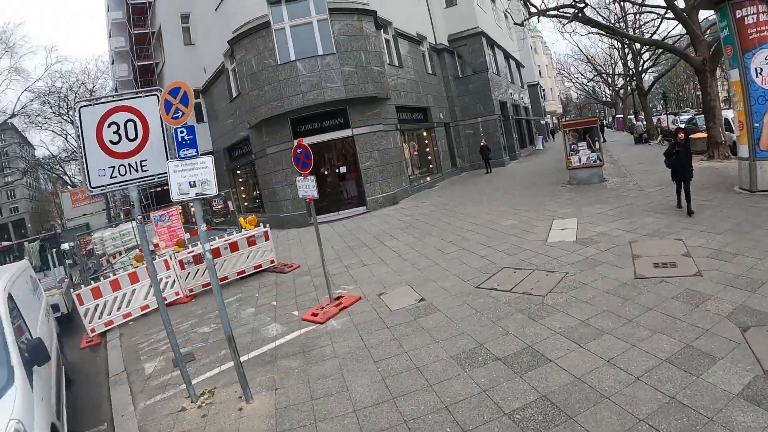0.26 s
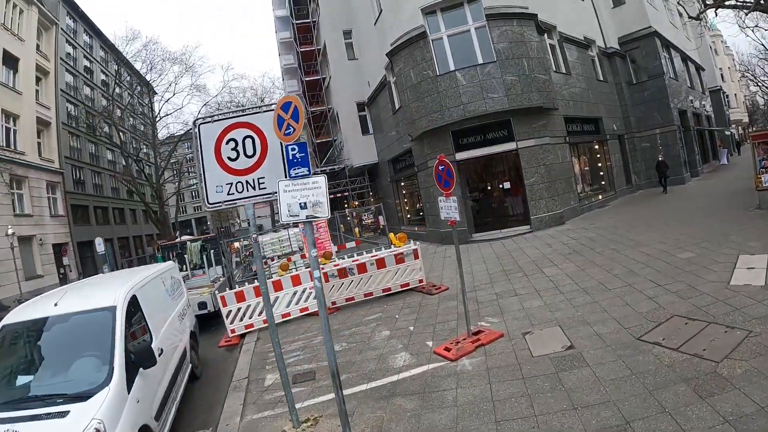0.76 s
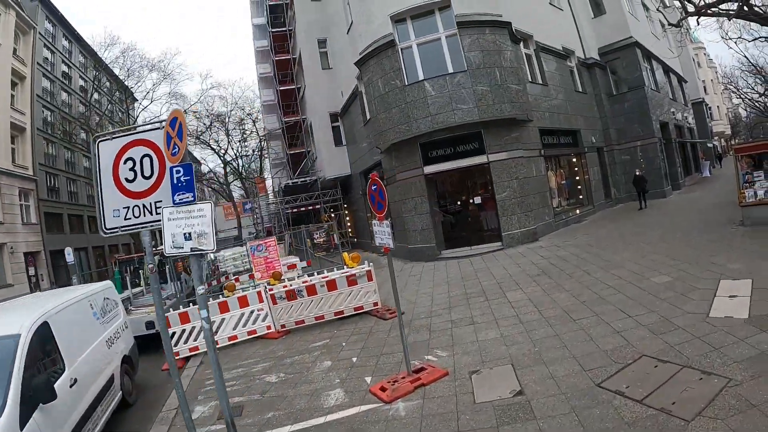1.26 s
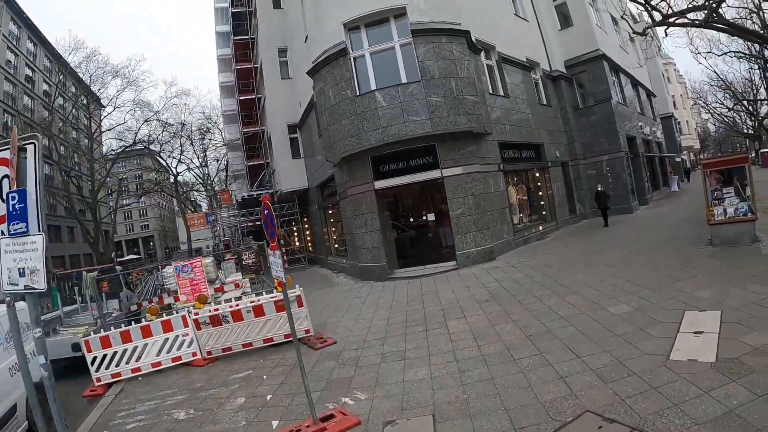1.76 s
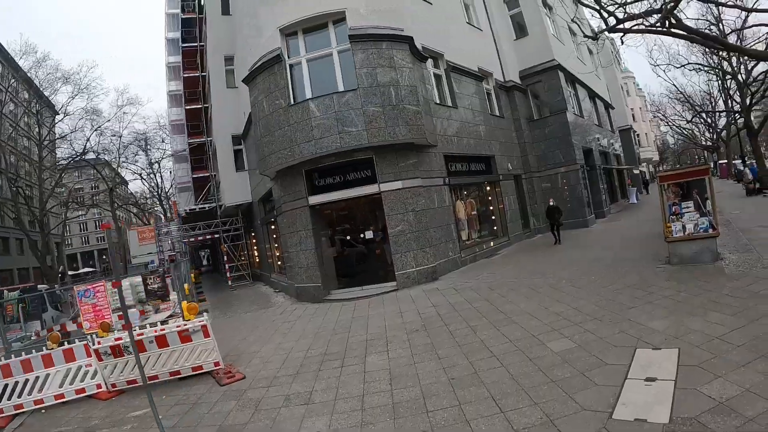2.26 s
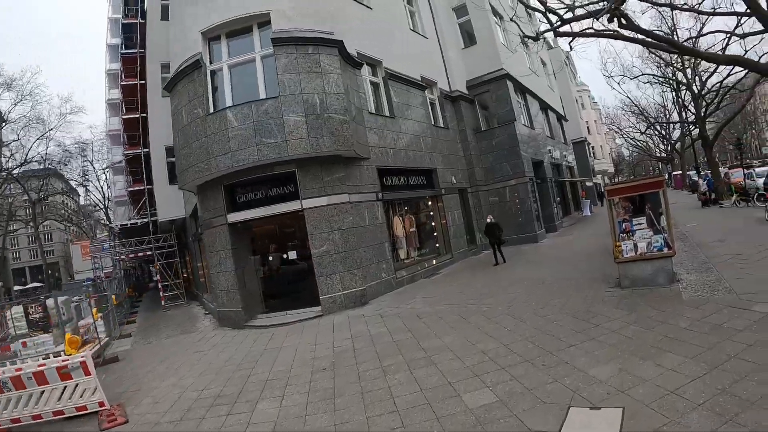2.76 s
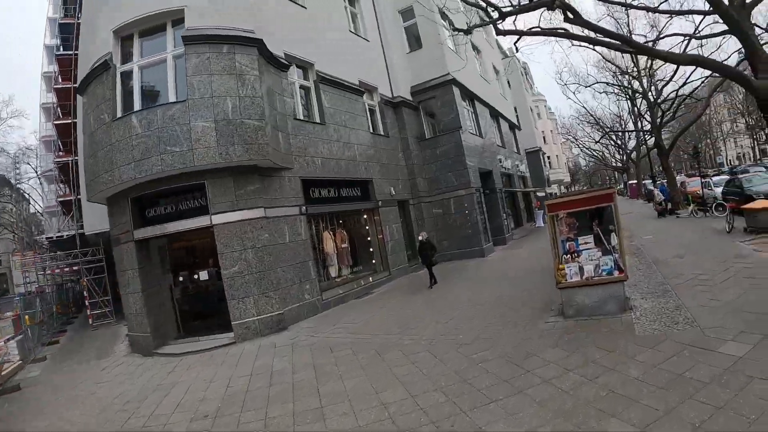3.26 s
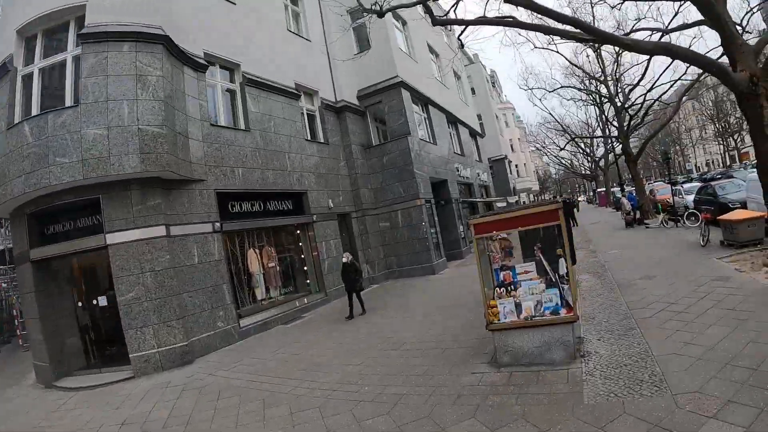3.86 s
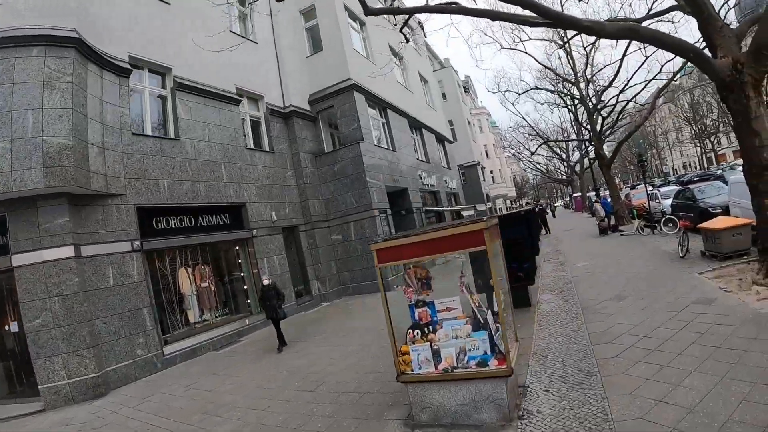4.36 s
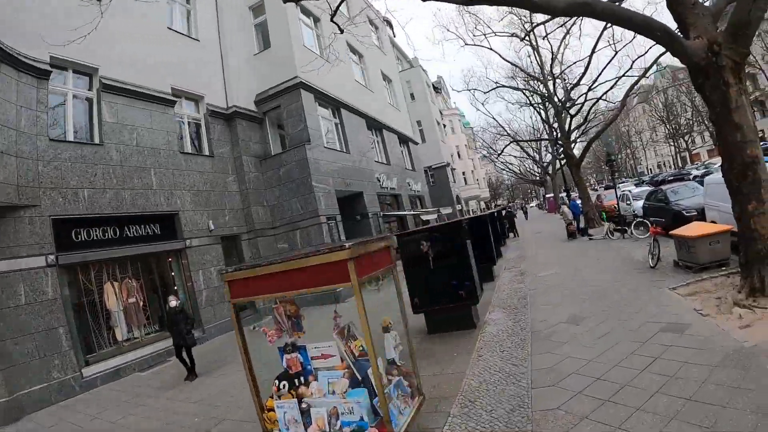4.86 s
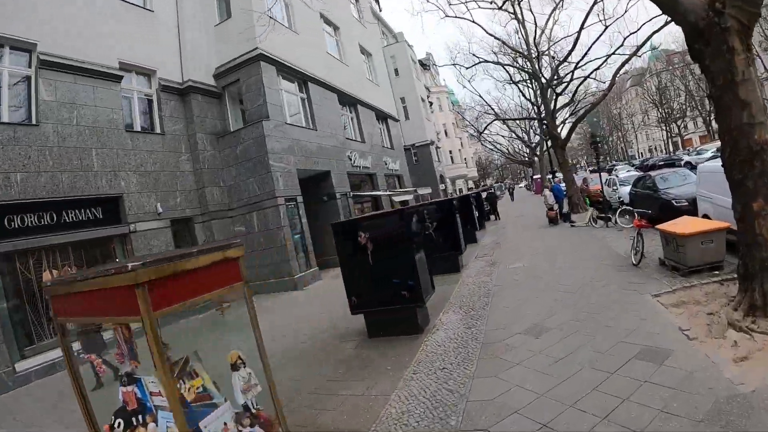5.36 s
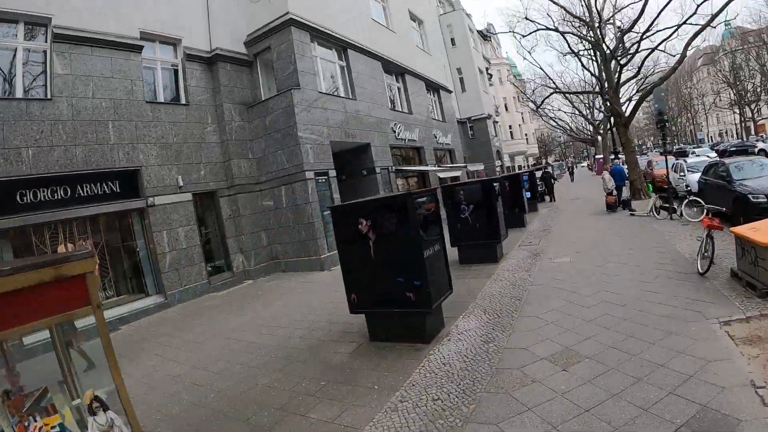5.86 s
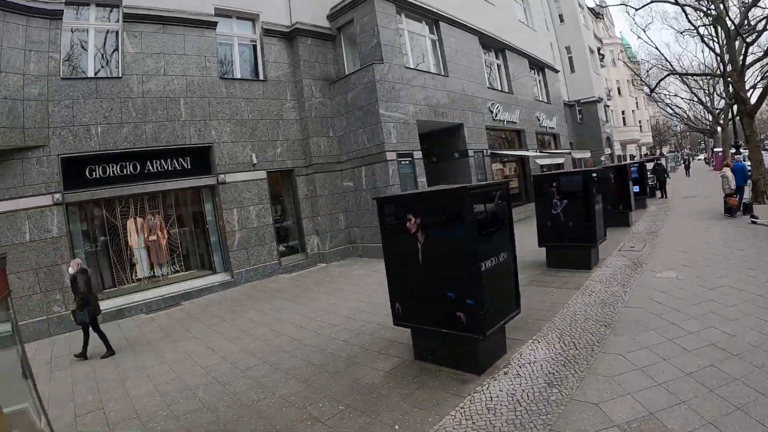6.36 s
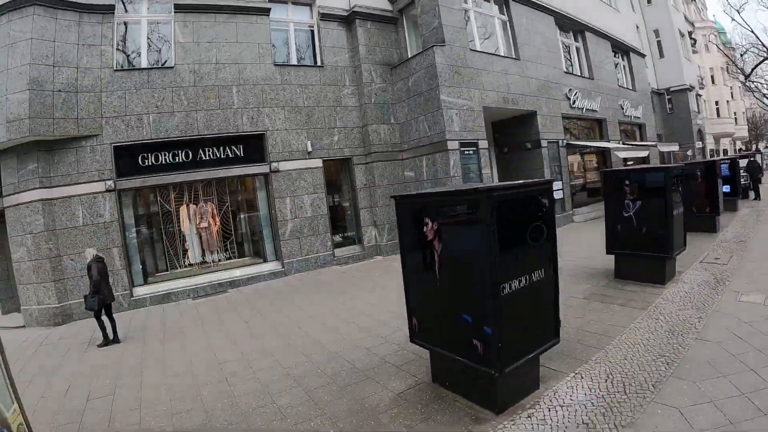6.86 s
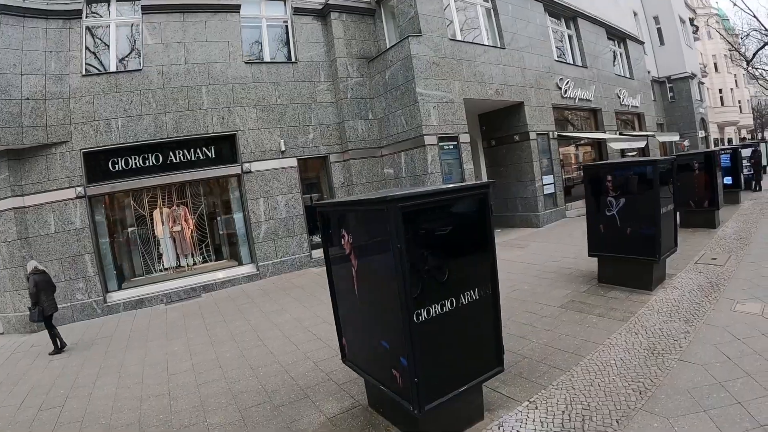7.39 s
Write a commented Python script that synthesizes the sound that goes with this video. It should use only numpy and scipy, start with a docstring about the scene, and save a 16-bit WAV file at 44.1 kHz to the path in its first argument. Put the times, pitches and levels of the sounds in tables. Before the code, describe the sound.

Low city traffic rumble with a heavy engine rising then dropping in pitch, later a faint metallic saw ringing, brief high brake squeal, and a slowing engine.

```python
"""Traffic past a city pavement

Ground rumble, engine drone, tyre roar and hiss: half-octave noise bands that swell and fade along level curves.
A heavy engine pulls up in pitch and eases off, others idle, start and slow: tones at multiples of the firing rhythm.
A saw blade rings in narrow noise bands beside a 7.5 kHz squealing band, a brake squeals very high as a wavering
sine in a halo of noise, faint noise bands and a swish swell and fade, damped modes make small knocks and ticks."""
import sys
import numpy as np
from scipy import signal
from scipy.fft import irfft, next_fast_len
from scipy.io import wavfile
from scipy.ndimage import uniform_filter1d

SR = 44100
rng = np.random.default_rng(int(sys.argv[2]) if len(sys.argv) > 2 else 0)


def unload_wav(signal):
    """Save mono or channel-first audio to the path in sys.argv[1] as 16-bit WAV at rate SR, clipped to [-1, 1]."""
    wavfile.write(
        sys.argv[1],
        SR,
        np.round(np.clip(np.atleast_2d(signal).T, -1, 1) * 32767).astype(np.int16),
    )


N = 336482

# Heavy engine pulling, then easing off. Each row: time in s, lowest tone in Hz, level in dB.
PULLING_ENGINE = [(0, 80.5, -19.5), (.45, 83.8, -24.5), (.68, 85.8, -27.5), (.89, 87.96, -29.5),
                  (1.29, 92.1, -29.5), (1.48, 92.3, -31.5), (1.66, 86.95, -29.5), (1.86, 79.9, -31.5),
                  (1.96, 76.3, -21.5), (2.18, 68.3, -16.5), (2.225, 65.7, -21.5), (2.27, 64.04, -15),
                  (2.33, 62.2, -14.5), (2.38, 59.8, -28.5), (2.6, 49.14, -32), (2.7, 45.44, -28),
                  (2.86, 42.5, -33), (2.92, 42.1, -43)]
# Saw blade and a squealing band. Each row: time in s, then level in dB of the lowest blade mode,
# of the close pair of blade modes, of a 7.5 kHz squealing band, of the top blade mode.
SAW_AND_SQUEAL_LEVELS = [(2.65, -85, -90, -95, -86.5), (2.88, -74, -71, -65, -60.5),
                         (3.05, -72, -64, -51.5, -62), (3.43, -69, -71, -68, -58.5),
                         (3.7, -60, -65, -66, -59.5), (3.92, -56, -66, -72, -63),
                         (3.97, -66, -68, -73, -66), (4.13, -65, -74, -76, -65.5),
                         (4.6, -67, -71, -79, -59.5), (5.02, -60, -68, -62, -58.5),
                         (5.12, -64, -66, -59, -56.5), (5.21, -67, -61, -56, -56),
                         (5.39, -64, -65, -56, -57), (5.57, -70, -80, -62.5, -77),
                         (5.88, -86, -93, -93, -87), (6.05, -77, -73, -74, -62.5),
                         (6.25, -61.5, -65, -75, -62), (6.59, -62.5, -63, -72, -65.5),
                         (6.76, -60, -64, -75, -67), (6.87, -60, -65, -78, -68),
                         (6.93, -72, -66, -77, -68.5), (7.03, -62, -63, -75, -67.5),
                         (7.16, -64, -64, -72, -65), (7.29, -71, -69, -76, -69.5),
                         (7.63, -78, -75, -78, -71)]


def undb(db):
    """Gain of a level in dB."""
    return 10 ** (np.asarray(db) / 20)


def columns(table):
    """Columns of a curve at every sample, then a gate with 30 ms fades just outside its first and last rows."""
    fade_s = .03
    row_s, *cols = np.transpose(table)
    t = np.arange(N) / SR
    since_start = t - row_s[0] + fade_s
    until_end = row_s[-1] + fade_s - t
    gate = np.clip(np.minimum(since_start, until_end) / fade_s, 0, 1)
    return [np.interp(t, row_s, col) for col in cols] + [gate]


def walk(rate_hz):
    """Random levels held 1 / rate_hz seconds and slewed twice; spread near 1."""
    hold = int(SR / rate_hz)
    steps = np.repeat(rng.standard_normal(N // hold + 1), hold)
    slewed = uniform_filter1d(uniform_filter1d(steps, hold), hold)
    return 1.3 * slewed[:N]


def noise(gain):
    """Noise whose spectrum follows gain(Hz), drawn bin by bin."""
    size = next_fast_len(N)
    hz = np.arange(size // 2 + 1) * SR / size + 1e-3  # offset keeps log(hz) finite
    bins = rng.standard_normal(2 * len(hz)).view(complex)
    return irfft(bins * gain(hz), size)[:N]


def unit(x):
    """Scaled to rms 1."""
    return x / np.sqrt(np.mean(x ** 2))


def ring(centre_hz, width_hz):
    """Noise of rms 1 heard through one steep resonance."""
    return unit(noise(lambda hz: 1 / (1 + (2 * (hz - centre_hz) / width_hz) ** 2) ** 1.5))


def tone(hz, waver_rad, multiple=1):
    """A tone of rms 1 whose phase wanders as firings or slips come unevenly."""
    phase = 2 * np.pi * np.cumsum(hz) / SR
    return np.sqrt(2) * np.sin(multiple * phase + waver_rad)


def traffic(flicker_db=0.74, lumps_db=1.16, dust=.12):
    """Half-octave bands of road noise; each flickers alone and follows the level of its layer."""
    # Noise spectrum within the layers. Each row: frequency in Hz, density in dB per Hz.
    road_spectrum = [(15, -12.5), (63, -3.5), (108, -6), (155, -12.5), (209, -16), (286, -15), (370, -17),
                     (507, -17.5), (880, -22.5), (1100, -23), (1520, -27), (1800, -28), (2100, -32),
                     (3100, -36.5), (3650, -38), (4100, -39), (5000, -48), (6500, -56), (8400, -49.5),
                     (9400, -59), (11000, -68), (12400, -72), (13500, -78), (14800, -98)]
    # Borders between the layers, in Hz.
    layer_edges_hz = [0, 60, 110, 210, 300, 750, 2000, 4200, 7000, 17000]
    # Each row: time in s, ground rumble in dB, exhaust boom in dB.
    rumble_levels = [(0, -31, -33), (.12, -29.5, -34), (.5, -34, -32.5), (.9, -29, -30.5),
                     (1.42, -38, -29.5), (1.58, -23.5, -28.5), (1.7, -27.5, -27), (1.9, -29, -35.5),
                     (2.3, -32, -34.5), (2.76, -30, -30), (2.91, -32, -37), (3.02, -30.5, -34.5),
                     (3.3, -24.5, -31.5), (3.37, -38, -38), (3.49, -31, -30), (3.7, -30, -31.5),
                     (3.76, -37, -36), (3.82, -25, -31), (4.16, -30, -36), (4.28, -46, -37),
                     (4.34, -25, -36), (4.48, -28, -29), (4.55, -36, -32), (4.61, -29, -33),
                     (5.15, -28.5, -33), (5.23, -30.5, -39), (5.5, -27.5, -29), (5.65, -33, -35),
                     (5.73, -26.5, -33.5), (6.1, -31, -28), (6.42, -23, -31.5), (6.58, -30.5, -40),
                     (6.66, -21.5, -36), (7.15, -35.5, -38), (7.24, -28.5, -31.5), (7.46, -26.5, -30),
                     (7.63, -28, -30)]
    # Each row: time in s, engine drone level in dB of the lower part, of the upper part.
    drone_levels = [(0, -39.5, -43.5), (.9, -37.5, -43), (1.5, -37, -42.5), (1.95, -37.5, -42),
                    (2.2, -36, -40), (2.46, -39, -44.5), (2.9, -40, -43.5), (3.5, -36.5, -42),
                    (4.2, -39, -42.5), (5, -38, -42.5), (5.4, -37, -41.5), (5.76, -37, -42.5),
                    (6.12, -35, -42.5), (6.35, -39.5, -42), (6.9, -35, -44), (7.63, -33.5, -43.5)]
    # Each row: time in s, low roar in dB, tread roar in dB, hiss in dB.
    tyre_levels = [(0, -42.5, -45, -59.5), (.3, -41.5, -44, -59), (.66, -41, -43, -56.5),
                   (1.3, -40.5, -42.5, -56.5), (1.9, -41, -44.5, -59.5), (2.2, -41, -45, -62),
                   (2.43, -44.5, -47, -66.5), (2.79, -41.5, -45, -69), (2.94, -42, -44, -61),
                   (3.7, -39, -41.5, -58.5), (4.2, -40, -41.5, -58.5), (5, -40, -40.5, -58.5),
                   (5.3, -39.5, -41, -60), (5.5, -40.5, -42, -64.5), (5.93, -41.5, -43.5, -67),
                   (6.1, -42.5, -44, -63), (6.45, -42.5, -43.5, -64), (6.9, -41.5, -43, -62),
                   (7.63, -42, -42.5, -64)]
    # Layers just below and above the hiss. Each row: mean level in dB, share of the swing in tread roar,
    # share of the swing in hiss.
    tyre_layers = [(-48.5, 0.68, 0.24), (-70, 1.3, 0.38)]

    road_hz, road_db = np.transpose(road_spectrum)
    layers = np.zeros((len(layer_edges_hz) - 1, N))
    for octave in np.arange(4, 14.5, .5):  # log2 of the band centre in Hz
        def gain(hz):
            offset = np.clip(np.log2(hz) - octave, -.5, .5)
            share = np.cos(np.pi * offset)  # neighbours add up to even power
            return share * undb(np.interp(np.log(hz), np.log(road_hz), road_db))
        layer = np.searchsorted(layer_edges_hz, 2 ** octave) - 1
        layers[layer] += noise(gain) * undb(flicker_db * walk(9))

    rumble_boom = [db + lumps_db * walk(6) for db in columns(rumble_levels)[:-1]]
    drone = columns(drone_levels)[:-1]
    low, roar, hiss = columns(tyre_levels)[:-1]
    roar_swing = roar - roar.mean()
    hiss_swing = hiss - hiss.mean()
    below, air = (mean_db + by_roar * roar_swing + by_hiss * hiss_swing
                  for mean_db, by_roar, by_hiss in tyre_layers)
    top_mode, cutting = columns(SAW_AND_SQUEAL_LEVELS)[-2:]
    air = air + dust * cutting * (top_mode - top_mode.mean())  # highest air partly follows the saw

    levels_db = rumble_boom + drone + [low, roar, below, hiss, air]
    return sum(unit(x) * undb(db) for x, db in zip(layers, levels_db))


def engine(table, tones_db=(0,), waver_rad=0.42, throb_db=1.5):
    """Exhaust tones at whole multiples of the firing rhythm; each throbs a little."""
    hz, level_db, gate = columns(table)
    out = np.zeros(N)
    for multiple, tone_db in enumerate(tones_db, start=1):
        gain = undb(level_db + tone_db + throb_db * walk(12))
        out += gain * tone(hz, waver_rad * walk(9), multiple)
    return gate * out


def load(waver_rad=.18, throb_db=1.1):
    """Upper exhaust tones of the pulling engine, on its firing rhythm; each throbs a little."""
    # Each row: time in s, level in dB of tone 2, of tone 3, of tone 4.
    upper_tones = [(0, -45.5, -39.5, -43), (.2, -40, -43.5, -49.5), (.45, -44, -38.5, -55),
                   (.62, -45.5, -36.5, -49), (.72, -38, -36, -50), (.95, -41, -34.5, -51),
                   (1.2, -39.5, -37, -53), (1.3, -46, -41.5, -47.5), (1.45, -50, -41.5, -50),
                   (1.52, -56, -52, -43.5), (1.62, -52, -52.5, -54), (1.9, -50, -51, -49),
                   (2.18, -48, -47, -51), (2.3, -38, -46, -54), (2.45, -36.5, -53, -58),
                   (2.62, -32, -52, -58), (2.7, -42, -50, -60), (2.86, -32, -50, -58),
                   (2.92, -47, -54, -58)]
    *levels_db, gate = columns(upper_tones)
    hz = columns(PULLING_ENGINE)[0]
    wander = waver_rad * walk(10)  # shared by the three tones
    out = np.zeros(N)
    for multiple, db in enumerate(levels_db, start=2):
        out += undb(db + throb_db * walk(11.6)) * tone(hz, wander, multiple)
    return gate * out


def engines():
    """Firing tones of the pulling, idling, starting and slowing engines."""
    # Each row: time in s, lowest tone in Hz, level in dB.
    idling = [(.5, 47.9, -40), (.75, 47.7, -32), (.92, 47.54, -23.5), (1.3, 48.2, -31)]
    starting = [(1.45, 109.1, -45), (1.75, 113.4, -47), (2, 125, -39)]
    slowing = [(5.3, 38.8, -38), (5.53, 38.4, -30), (5.66, 37.2, -50), (5.75, 37.3, -27.5),
               (5.87, 37, -29.5), (6.1, 36.3, -21.5), (6.27, 35.3, -23.5), (6.4, 34.8, -38),
               (6.55, 33.84, -35), (6.72, 32.9, -27.5), (6.85, 32.56, -33), (7.0, 31.94, -27.5),
               (7.15, 31.4, -38), (7.25, 31.2, -22.5), (7.35, 30.54, -42), (7.5, 30, -37)]
    # Tones 1 and 2 of the slowing engine, in dB against its level.
    slowing_tones_db = [-4, 1]
    pulling = engine(PULLING_ENGINE) + load()
    return pulling + engine(idling) + engine(starting) + engine(slowing, slowing_tones_db)


def saw_and_squeal_band(chatter_db=0.5, trade_db=1.1, lowest_db=1.3):
    """Rubbing teeth shake blade modes into rough bands, a close pair trading strength; a 7.5 kHz band squeals."""
    # Two blade modes and the close pair make rows 1-3 and 5; row 4 is the squealing band.
    # Each row: centre in Hz, width in Hz.
    bands = [(4445, 190), (7010, 200), (7170, 200), (7490, 130), (8270, 160)]
    lowest, pair, squeal_band, top, gate = columns(SAW_AND_SQUEAL_LEVELS)
    trade = trade_db * walk(6.9)
    levels_db = [lowest + lowest_db * walk(12), pair + trade, pair - trade, squeal_band, top]
    ringing = sum(undb(db) * ring(*band) for band, db in zip(bands, levels_db))
    return gate * undb(chatter_db * walk(25)) * ringing


def brake(waver_rad=.4, halo_width_hz=190, halo_db=-2):
    """A pad slips on the disc: a high sagging squeal with a reverberant halo of narrow noise."""
    # Each row: time in s, pitch in Hz, level in dB.
    squeal = [(5.1, 15200, -100), (5.15, 15050, -76), (5.25, 15070, -72), (5.33, 15030, -82),
              (5.395, 14974, -61), (5.48, 14900, -70), (5.58, 14850, -90), (5.644, 14866, -74),
              (5.675, 14940, -80), (5.705, 14880, -60), (5.77, 14840, -70), (5.8, 14800, -83),
              (5.94, 14790, -106)]
    hz, db, gate = columns(squeal)
    halo = undb(halo_db) * ring(0, halo_width_hz)  # slow noise, moved up around the squeal by the product
    return gate * undb(db) * (1 + halo) * tone(hz, waver_rad * walk(60))


def knocks(crack_db=-6, crack_hz=3200, crack_s=.001, contact_s=.0004):
    """Each knock rings one damped mode; the thin ones carry a short, dulled crack of noise."""
    # Dull knocks and two ticks. Each row: start in s, level in dB, pitch in Hz, ring t60 in s.
    knock_rows = [(1.99, -18.5, 110, 0.13), (2.286, -25, 265, 0.061), (2.6, -23.5, 129.2, 0.13),
                  (3.428, -39, 2500, .03), (6.135, -46, 3000, .015)]
    out = np.zeros(N)
    grit = ring(0, 2 * crack_hz)
    for start_s, db, hz, t60_s in knock_rows:
        t = np.clip(np.arange(N) / SR - start_s, 0, None)
        decay = np.exp(-np.log(1000) * t / t60_s)
        mode = np.sin(2 * np.pi * hz * t) * decay * np.tanh(t / contact_s)
        out += undb(db) * mode
        if hz > 1000:
            burst = t / crack_s * np.exp(1 - t / crack_s)  # peaks at crack_s
            out += undb(db + crack_db) * burst * grit
    return out


def swells(table):
    """Bands of noise that rise and fall once, each along half a sine."""
    t = np.arange(N) / SR
    out = np.zeros(N)
    for start_s, length_s, centre_hz, width_hz, peak_db in table:
        rise_fall = np.sin(np.pi * np.clip((t - start_s) / length_s, 0, 1))
        out += undb(peak_db) * rise_fall * ring(centre_hz, width_hz)
    return out


def swish():
    """A short bright swish of broad noise bands."""
    # Each row: start in s, length in s, centre in Hz, width in Hz, peak level in dB.
    swish_bands = [(5.16, 0.17, 1100, 1100, -36), (5.13, 0.21, 3400, 1400, -54),
                   (5.13, 0.22, 4600, 1800, -53)]
    return swells(swish_bands)


def faint_bands():
    """Faint noise bands, some whining, that swell and fade."""
    # Each row: start in s, length in s, centre in Hz, width in Hz, peak level in dB.
    band_rows = [(-0.05, 0.34, 3520, 120, -59), (-0.5, .85, 7040, 200, -66), (0, .3, 4500, 400, -62),
                 (-0.5, .22, 4980, 150, -64), (.45, .45, 4700, 700, -59.5), (.5, .4, 3670, 200, -62),
                 (.5, 1.09, 8350, 400, -67.5), (1.1, 0.9, 5000, 380, -62), (1.2, 0.8, 3640, 170, -61),
                 (1.8, 0.55, 4700, 600, -61), (1.1, .8, 4330, 350, -62), (0.2, .6, 1060, 220, -49),
                 (.4, .85, 660, 40, -54.5), (4.5, 2.36, 793, 160, -51.5), (1.5, 1.5, 8033, 250, -77),
                 (4.75, .45, 7850, 250, -60), (2.5, 0.98, 3470, 460, -58.5), (3.8, 1.5, 3580, 440, -57.5),
                 (5.58, .27, 7350, 150, -71)]
    return swells(band_rows)


def scene():
    """All sources meet at one microphone."""
    vehicles = traffic() + engines() + brake()
    return (vehicles + saw_and_squeal_band() + knocks() + swish() + faint_bands())[None]


def record(dry, top_hz=15700):
    """The recorder cuts the top with a steep elliptic low-pass."""
    low_pass = signal.ellip(8, .2, 70, top_hz, fs=SR, output="sos")  # order, ripple dB, stop dB
    return signal.sosfilt(low_pass, dry)


dry = scene()
out = record(dry)
unload_wav(out)
```